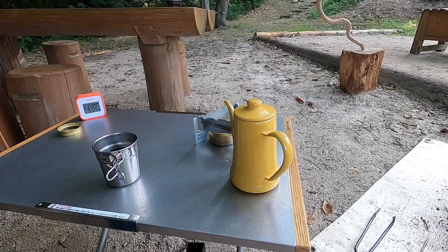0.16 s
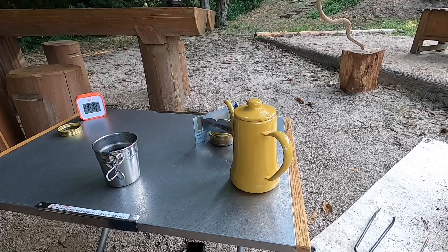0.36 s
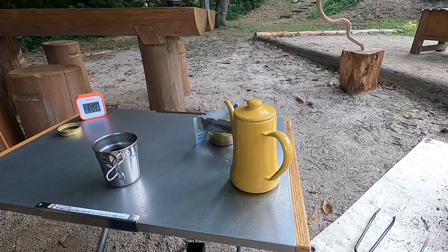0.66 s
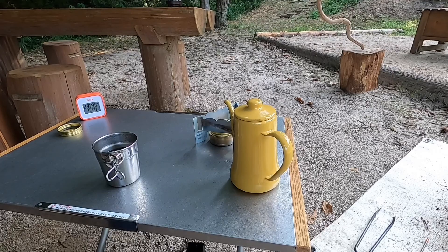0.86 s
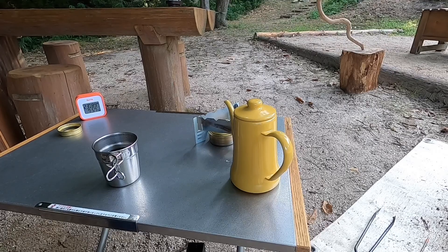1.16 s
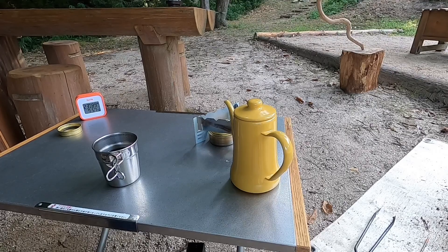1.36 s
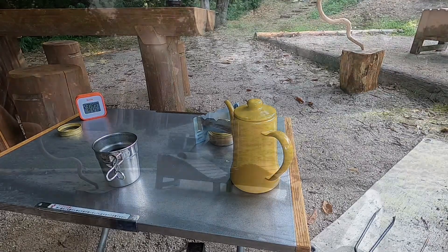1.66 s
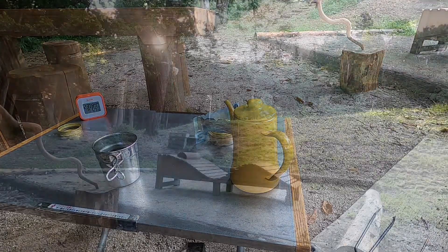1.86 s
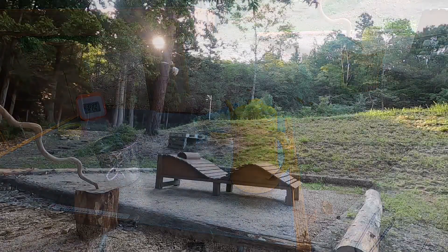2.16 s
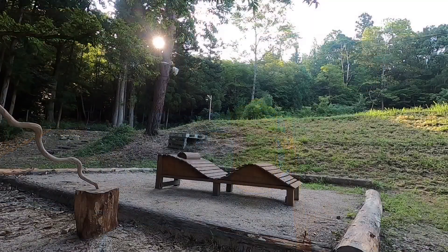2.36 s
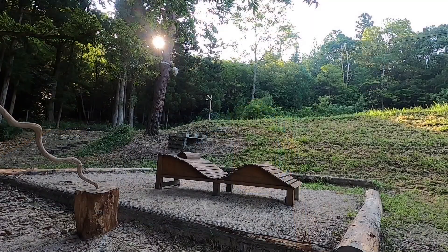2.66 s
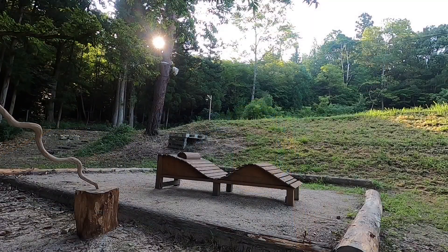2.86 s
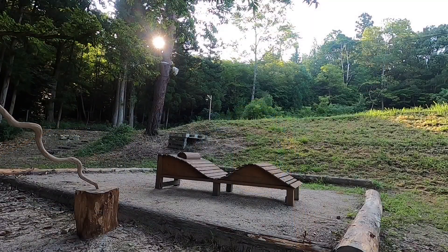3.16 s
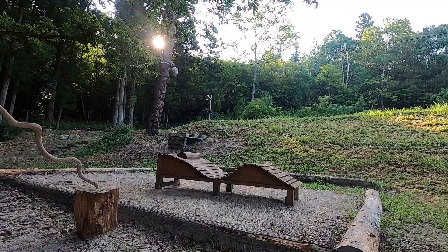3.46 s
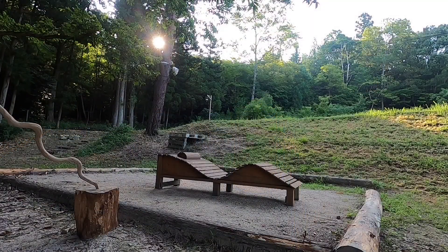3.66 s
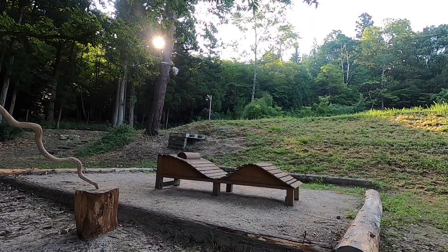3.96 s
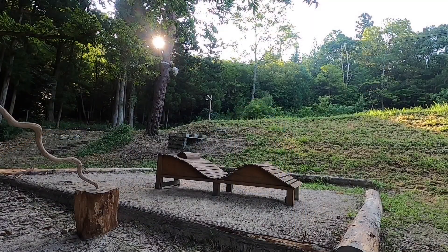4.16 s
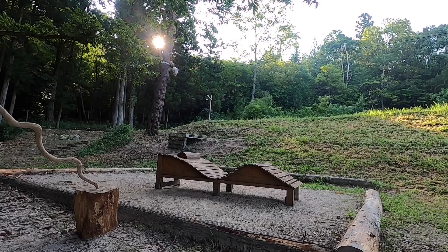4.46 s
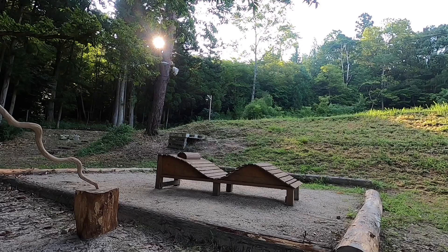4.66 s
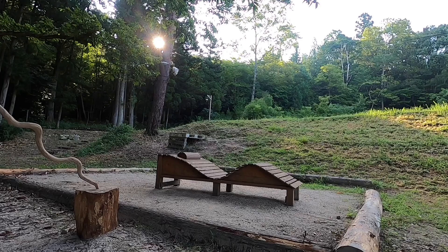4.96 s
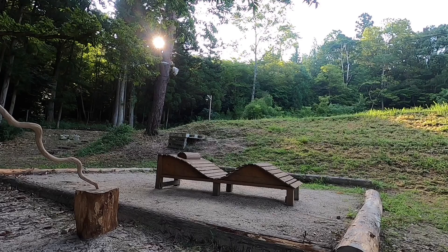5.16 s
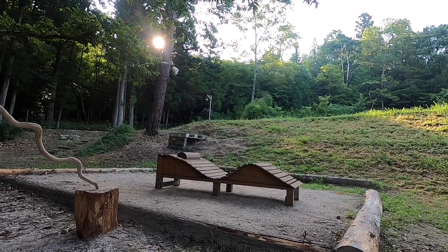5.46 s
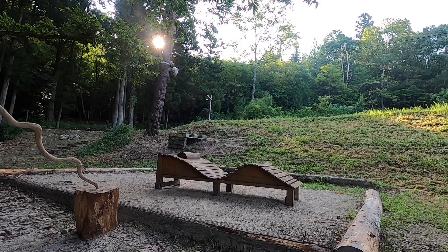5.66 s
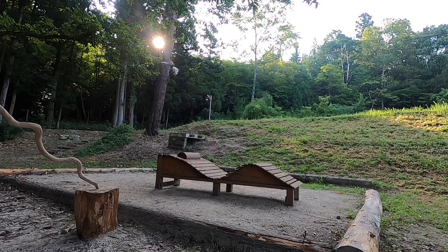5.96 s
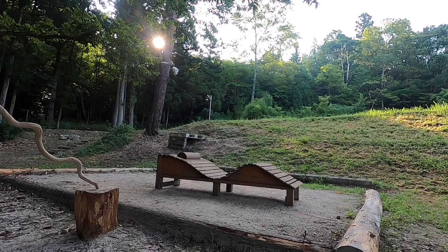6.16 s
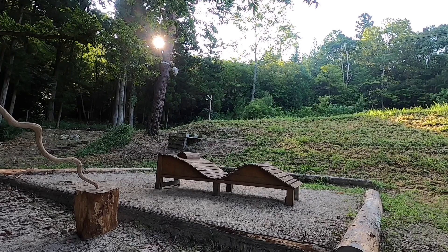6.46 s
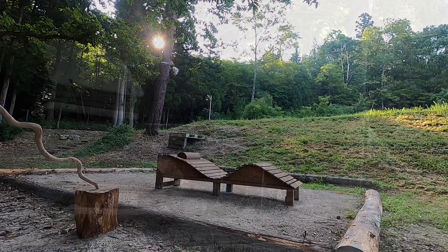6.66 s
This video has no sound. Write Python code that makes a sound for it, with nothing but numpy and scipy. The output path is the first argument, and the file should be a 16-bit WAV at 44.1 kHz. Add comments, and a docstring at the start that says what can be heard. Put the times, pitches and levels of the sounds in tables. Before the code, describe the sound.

Outdoors at a wooded campsite, a dense, shrill cicada chorus runs throughout. At first one close cicada on the left pulses rapidly over it. The sound cross-fades to an open meadow where lower-voiced cicadas swell, gusts shake the microphone into deep rumbling, and small dry ticks, soft bumps and rustles cluster close on the left. A small bird whistles faintly far off.

```python
"""Cicadas drone in the woods, heard first from a camp table, where one near cicada throbs over the chorus.
A cross-fade leads to a meadow: lower voices swell, a breeze shakes the microphone into a low rumble,
something ticks, bumps and rustles close by on the left, and a small bird calls far off.
Cicadas are random clicks sent through resonances, with thin wavering tones on top. Rumble and rustle are
shaped noise, ticks and bumps are short bursts, and the bird is a gliding sine with echoes."""
import sys
import numpy as np
from scipy import signal
from scipy.fft import rfft, irfft
from scipy.io import wavfile

SR = 44100
rng = np.random.default_rng(int(sys.argv[2]) if len(sys.argv) > 2 else 0)


def dump(signal):
    """Clip the signal to [-1, 1] and save it as 16-bit WAV at the path in sys.argv[1]."""
    limited = np.clip(np.atleast_2d(signal).T, -1, 1)
    pcm = np.round(limited * 32767).astype(np.int16)
    wavfile.write(sys.argv[1], SR, pcm)


N = 299880  # length in samples
T = np.arange(N) / SR  # time of every sample [s]
HZ = np.fft.rfftfreq(N, 1 / SR)  # frequencies of the spectrum [Hz]


def amp(db):
    """Turns decibels into a gain."""
    return np.exp(np.log(10) * np.asarray(db) / 20)


def unit(x):
    """Scales a sound to an average strength (rms) of 1."""
    return x / np.sqrt(np.mean(x ** 2) + 1e-20)


def peaked(x, db):
    """Scales a sound to a peak level."""
    return amp(db) * x / np.max(abs(x))


def read(points):
    """Reads a table over frequency, joining its points on a log axis."""
    hz, value = np.transpose(points)
    return np.interp(np.log(HZ + 1), np.log(hz + 1), value)


def level(rows):
    """Turns a table of (time [s], level [dB]) into a gain for every sample."""
    return amp(np.interp(T, *np.transpose(rows)))


def plateau(start, hold, rise_db, fall_db):
    """Gain of a swell that rises, holds at 1 and falls; slopes in dB per second."""
    before = np.maximum(start - T, 0)
    after = np.maximum(T - start - hold, 0)
    return amp(-abs(rise_db) * before - abs(fall_db) * after)


def colour(x, spectrum, lines=()):
    """Filters by a spectrum with narrow resonances on top, to rms 1."""
    peaks = sum(db / (1 + (2 * (HZ - hz) / width) ** 2) for hz, width, db in lines)
    return unit(irfft(rfft(x) * amp(read(spectrum) + peaks), N))


def band(x, hz):
    """Keeps about an octave around hz."""
    octave = signal.butter(3, [hz / 1.5, hz * 1.35], "band", fs=SR, output="sos")
    return signal.sosfilt(octave, x)


def drift(hz):
    """Slow random wandering of rms 1, up to about hz."""
    return unit(irfft(rfft(rng.standard_normal(N)) / (1 + (HZ / hz) ** 4), N))


def pan(db):
    """Left and right gains for a level difference; positive is louder on the left."""
    return amp(np.array([[db], [-db]]) / 2)


def spread(pair, side_db):
    """Two unrelated sounds as the middle and the sides of a stereo pair."""
    return pair[0] + np.array([[1], [-1]]) * amp(side_db) * pair[1]


def add(mix, s, sound):
    """Adds a sound at time s."""
    part = mix[max(round(s * SR), 0):][:len(sound)]
    part += sound[:len(part)]


def scatter(x, t60):
    """Echoes off ground and trunks: sparse dying taps, different for each ear."""
    t = T[:SR // 2]
    is_tap = rng.random((2, len(t))) < .05
    taps = rng.standard_normal((2, len(t))) * is_tap * amp(-60 * t / t60)
    taps /= np.linalg.norm(taps, axis=1, keepdims=True)
    return signal.fftconvolve(x[None], taps, axes=1)[:, :N]


def tymbals(count, rib_hz, stroke_hz, flutter_db):
    """Many insects: each buckles its ribs in quick clicks, grouped by the strokes of its muscle."""
    out = np.zeros(N)
    for _ in range(count):
        # every insect has its own speeds
        ribs, strokes, flutter = rng.uniform(.7, 1.3, 3)
        gaps = 1 + .12 * rng.standard_normal(9000)
        s = np.cumsum(gaps) / (rib_hz * ribs)
        size = 1 + np.cos(2 * np.pi * (stroke_hz * strokes * s + rng.random()))
        size *= amp(flutter_db * np.sin(2 * np.pi * (10 * flutter * s + rng.random())))
        clicks = size * rng.choice([-1, 1], len(s))
        at = (s * SR).astype(int)
        out += np.bincount(at[at < N], clicks[at < N], N)
    return unit(out)


def tone(hz, waver):
    """A thin strand that wavers in pitch and flickers in level."""
    flicker_db = 1.8
    turns = np.cumsum(hz * (1 + waver * drift(50))) / SR
    return np.sin(2 * np.pi * turns) * amp(flicker_db * drift(9.3))


def chorus(table, meadow):
    """The drone of the woods: tymbal clicks through the insects' body resonance, wider by the table."""
    # colour of the chorus at each place: (frequency [Hz], relative level [dB per Hz])
    table_colour = [(2500, -100), (3800, -31), (4500, -16.5), (5250, -13.5), (5600, -10), (6300, -9.5),
                    (6800, -9.5), (7300, -3.5), (7900, -3), (8500, -5.5), (9100, -13.5), (9700, -25.5),
                    (10400, -33), (12300, -28), (15500, -37)]
    meadow_colour = [(2500, -75), (4000, -35.5), (4900, -26.5), (5250, -37.5), (5900, -30), (6350, -16),
                     (6800, -4.5), (7600, 0), (8500, -6.5), (9100, -12.5), (9700, -22), (10300, -29.5),
                     (10900, -70.5), (15000, -37)]
    # shrill lines that stand out of it: (frequency [Hz], width [Hz], boost [dB])
    table_lines = [(7230, 120, 1), (7780, 110, 1.5), (7990, 80, -3), (8570, 100, 2)]
    meadow_lines = [(5540, 67, 5.4), (6500, 56, 1.1), (7900, 35, 2.1), (7140, 41, 0.86), (7930, 47, 3.1),
                    (8580, 130, 4.7)]
    table_db, meadow_db = -23.0, -25.5  # loudness at each place before panning and fading
    near = np.array([tymbals(count=14, rib_hz=685.0, stroke_hz=167.2, flutter_db=-3.5) for _ in range(2)])
    far = np.array([tymbals(count=30, rib_hz=697.2, stroke_hz=110.1, flutter_db=0.5) for _ in range(2)])
    near = colour(spread(near, side_db=-10.5), table_colour, table_lines)
    near = near * amp(table_db + .5 * drift(37)) * pan(db=1.0)
    far = colour(spread(far, side_db=-20.5), meadow_colour, meadow_lines)
    far = far * amp(meadow_db + 0.35 * drift(36)) * pan(db=1.5)
    return table * near + meadow * far


def throbber(table):
    """One near cicada pumps its abdomen about thirteen times a second, never quite silent in between."""
    # throbs of the near cicada: (time [s], level [dB])
    throb_times = [(.01, -31), (.08, -30), (.14, -29), (.228, -28.5), (.307, -35), (.38, -30), (.445, -33),
                   (.535, -31), (.605, -28), (.677, -32), (.765, -30), (.82, -34), (.9, -33), (.968, -28),
                   (1.048, -33), (1.115, -29.5), (1.201, -27.5), (1.264, -28.5), (1.345, -31),
                   (1.412, -28.5), (1.489, -31.5), (1.57, -32), (1.629, -28.5), (1.715, -33), (1.789, -32),
                   (1.859, -35), (1.935, -33)]
    # colour of its voice: (frequency [Hz], relative level [dB per Hz])
    throb_colour = [(3000, -42), (3900, -18), (4500, -6), (5200, -5), (5600, -2), (6300, -1), (7000, -7),
                    (8300, -9), (9300, -20), (10500, -37)]
    # shrill lines in that voice: (frequency [Hz], width [Hz], boost [dB])
    throb_lines = [(4494, 35, 8), (4591, 40, 8), (4685, 40, 8), (4832, 60, 6), (4956, 40, 8), (5131, 35, 6),
                   (5490, 110, 10), (5690, 80, 4), (5950, 70, 4)]
    # clear strands in its buzz: (frequency [Hz], level against one another [dB])
    strand_table = [(4320, -22), (4494, -16), (4591, -15), (4685, -16), (4832, -16), (4956, -13),
                    (5131, -14), (5336, -17), (5462, -11)]
    width_s, between_db = 0.0145, -38  # spread of a throb to each side, and the level between throbs
    throbs = sum(amp(db) * np.exp(-.5 * ((T - s) / width_s) ** 2) for s, db in throb_times)
    swell = np.hypot(throbs, amp(between_db))
    clicks = np.array([tymbals(count=14, rib_hz=702.0, stroke_hz=161.7, flutter_db=0.0) for _ in range(2)])
    voice = colour(spread(clicks, side_db=-8), throb_colour, throb_lines)
    strands = sum(amp(db) * tone(hz, waver=.0025) for hz, db in strand_table)
    return table * (voice + amp(-1.0) * strands) * swell * pan(db=5.5)


def low_group():
    """Lower-voiced cicadas join in slowly from all around: the same clicks, coloured lower."""
    # swell of the group: (time [s], level [dB])
    swell = [(0, -56), (2.2, -35), (3.5, -33), (4.6, -31.5), (5.3, -32.5), (5.8, -29), (6.4, -28.5),
             (6.8, -32.5)]
    # colour of its voice: (frequency [Hz], relative level [dB per Hz])
    low_colour = [(3000, -86), (4400, -28), (4950, -4), (5250, 0.5), (5500, 4), (5900, 6.5), (6350, 13.5),
                  (6900, -2.5), (8000, -65.5)]
    # shrill lines in that voice: (frequency [Hz], width [Hz], boost [dB])
    low_lines = [(5270, 160, 2.3), (5640, 60, 2.7), (6110, 90, 3), (6640, 160, 11)]
    clicks = np.array([tymbals(count=14, rib_hz=595.2, stroke_hz=98.66, flutter_db=2.5) for _ in range(2)])
    return colour(spread(clicks, side_db=-1.5), low_colour, low_lines) * level(swell) * pan(db=1.5)


def whines():
    """Now and then one cicada holds a wavering, slowly gliding pitch that stands out of the drone."""
    # single whines: (time [s], hold [s], start pitch [Hz], end pitch [Hz], level [dB],
    # pitch waver [share])
    whine_table = [(0, 1.3, 7230, 7220, -38, .002), (0, 1.3, 7770, 7790, -37, .002),
                   (2.3, 1.9, 6150, 6195, -45, .003), (3.05, .45, 6135, 6135, -43, .001),
                   (2.8, 1.3, 5510, 5570, -47, .006), (4.3, 1, 5085, 5135, -51.5, .0015),
                   (4.6, 1.7, 5230, 5340, -49.5, .009), (4.5, 1.4, 6235, 6280, -43, .002),
                   (5.5, .7, 5875, 5900, -44, .002), (5.6, .7, 6360, 6400, -42, .002)]
    slope = 50  # rise and fall [dB per s]
    out = np.zeros(N)
    for s, hold, start_hz, end_hz, db, waver in whine_table:
        hz = np.interp(T, [s, s + hold], [start_hz, end_hz])
        out += amp(db) * tone(hz, waver) * plateau(s, hold, slope, slope)
    return out * pan(db=-1.0)


def rumble(shake_hz=34.35, wander=0.057):
    """Gusts buffet the microphone; the stronger they are, the more they shake it at a wandering low pitch."""
    # gusts: (time at full strength [s], hold [s], level before the lulls [dB], rise [dB per s])
    gust_table = [(.35, .02, -51, 200), (1.393, .02, -48.5, 250), (1.93, 0.036, -43.5, 120),
                  (2.174, .57, -33, 130), (2.92, 0.26, -38, 120), (3.22, .05, -33.5, 92),
                  (3.397, 0.45, -29, 52), (3.95, 0.31, -37.5, 60), (4.293, 0.12, -35, 112),
                  (4.517, 0.027, -37, 88), (4.72, .02, -46, 150), (4.995, 0.45, -43, 150),
                  (5.84, 0.14, -38.5, 66), (6.07, 0.097, -32.5, 150), (6.32, .03, -34.5, 220),
                  (6.464, 0.025, -40.5, 100), (6.64, 0.055, -35.5, 90)]
    # colour of the buffeting: (frequency [Hz], relative level [dB per Hz])
    buffet_colour = [(5, -13), (20, 6), (35, 11), (55, -1.5), (90, -13.5), (135, -11.5), (250, -22.5),
                     (450, -47), (700, -32), (3000, -79)]
    fall, calm_db = 127, -62  # fall of a gust [dB per s], and the level of the calm before the lulls
    lull_db, lulls_hz = 1.5, 7.8  # depth and top speed of the brief dips in the wind
    turn = 2 * np.pi * np.cumsum(shake_hz * (1 + wander * drift(10.1))) / SR
    shake = unit(np.sin(turn) + amp(-17.5) * np.sin(2 * turn))
    swells = [amp(db) * plateau(s, hold, rise, fall) for s, hold, db, rise in gust_table]
    wind = np.max(swells, axis=0)
    lulls = amp(lull_db * (1 - drift(lulls_hz) ** 2))
    force = np.hypot(wind, amp(calm_db)) * lulls
    # share of the power that goes into the shaking
    share = force ** 2 / (force ** 2 + amp(-41) ** 2) * .93
    buffets = colour(spread(rng.standard_normal((2, N)), side_db=-15.0), buffet_colour)
    return force * (np.sqrt(share) * shake + np.sqrt(1 - share) * buffets) * pan(db=0.5)


def body(pitch):
    """The short ring of the small light thing that ticks: a sum of dying tones."""
    # what it rings with: (frequency at pitch 1 [Hz], relative level [dB], time to fall 60 dB [s])
    modes = [(1330, -4, .02), (1620, 0, .028), (1850, 0, .019), (2240, -1, .024), (2620, -10, .018),
             (2980, -7, .02), (3720, -1.5, .016), (4060, -1.5, .015), (4700, -8, .016)]
    t = T[:2048]
    onset = 1 - np.exp(-t / .0002)
    return onset * sum(amp(db - 60 * t / t60) * np.cos(2 * np.pi * hz * pitch * t) for hz, db, t60 in modes)


def clatter(decay_s):
    """The force of one touch: a quick rise, then rough contact that dies away."""
    t = T[:4096]
    return rng.standard_normal(len(t)) * np.exp(-t / decay_s) * (1 - np.exp(-t / .001))


def snap():
    """The force of one hard touch: a sudden snap, then a brief clatter."""
    return np.append(3.2, clatter(decay_s=0.0027))


def ticks():
    """Each tick is a brief clatter: the ring of the body and a dry clack whose pitch depends on the touch."""
    # ticks close on the left: (time [s], peak of the ring before tick_db [dB],
    # peak of the clack before tick_db [dB], pitch of the clack [Hz])
    tick_table = [(2.043, -36, -36, 3820), (2.085, -30, -39, 1700), (2.139, -30, -30, 4030),
                  (2.2384, -27.5, -28, 4040), (2.3023, -27, -33, 4000), (2.346, -27, -30, 3900),
                  (2.381, -25.5, -30, 3600), (2.3962, -32, -28.5, 1440), (2.407, -25.5, -35, 1320),
                  (2.4416, -28.5, -36, 3600), (2.4837, -25, -37, 3900), (2.509, -39, -26, 3580),
                  (2.5172, -35, -26, 3550), (2.526, -33, -22.5, 3760), (2.573, -31, -43, 4000),
                  (2.6715, -41, -33, 3600), (2.842, -27.5, -30, 1250), (3.008, -38, -46, 3300),
                  (3.0423, -34, -42, 1700), (3.063, -41, -27, 2480), (3.0873, -31, -37, 3000),
                  (3.128, -46, -33, 2500), (3.168, -31, -34, 3020), (3.174, -43, -33, 3300),
                  (3.243, -30.5, -40, 2940), (3.288, -33.5, -31, 3100), (3.325, -30.5, -38, 2800),
                  (3.3877, -40, -45, 3000), (3.4312, -31.5, -40, 2400), (3.476, -33, -32, 2640),
                  (3.516, -37, -42, 1790), (3.5568, -37, -39, 2900), (4.0023, -34.5, -43, 2400),
                  (4.032, -33.5, -37, 3700), (4.0438, -31.5, -27, 3000), (4.068, -30.5, -34, 3200),
                  (4.1117, -42, -34, 2500), (4.223, -29.5, -22.5, 4100), (4.81, -52, -39.5, 3400),
                  (6.05, -53, -38.5, 3700)]
    tick_db = 2  # added to every tick
    out = np.zeros(N)
    for s, ring_db, clack_db, hz in tick_table:
        pitch = 1.0 + 0.02 * rng.standard_normal()
        ring = signal.fftconvolve(snap(), body(pitch))
        add(out, s, peaked(ring, tick_db + ring_db))
        add(out, s, peaked(band(snap(), hz), tick_db + clack_db))
    echoes = amp(-9.5) * scatter(out, t60=.06)
    return out * pan(db=9.0) + echoes


def bumps():
    """Soft, quickly damped knocks of something being handled near the microphone."""
    # dull bumps among the ticks: (time [s], peak before bump_db [dB], pitch [Hz])
    bump_table = [(2.4, -39, 480), (2.427, -36, 169), (2.479, -36, 185), (3.086, -35.5, 278),
                  (3.354, -34, 330), (3.387, -38, 400), (3.431, -37, 520), (3.473, -34, 503),
                  (3.52, -34, 130), (3.55, -34.5, 330), (3.593, -37, 278), (3.962, -36, 257),
                  (4.041, -31, 487), (4.068, -37, 520), (4.225, -35, 440), (4.268, -38, 400)]
    bump_db = -3  # added to every bump
    out = np.zeros(N)
    for s, db, hz in bump_table:
        add(out, s, peaked(band(clatter(decay_s=0.0093), hz), bump_db + db))
    return out * pan(db=3.0)


def rustle(grain_db=3.0, grains_per_s=5000):
    """Soft strokes of tiny slips, close on the left; some of them scrape the ticking body."""
    # strokes: (time [s], hold [s], level [dB], share of the power that rings the ticking body [0-1])
    strokes = [(2.068, 0.016, -41.5, 0.26), (2.234, 0.27, -44, 0.25), (2.37, 0.15, -43.5, 0.1),
               (2.605, 0.061, -46, 0), (2.82, 0.48, -44, 0.03), (3.346, 0.22, -37, 0),
               (3.975, 0.12, -41, 0.01), (4.214, 0.05, -41.5, 0.02), (4.605, 0.22, -51, 0),
               (5.14, 0.12, -52.5, 0)]
    # colour of the slips: (frequency [Hz], relative level [dB per Hz])
    slip_colour = [(60, -2), (140, 7.5), (250, 0), (550, 9.5), (850, 1), (1300, 6.5), (2400, 10),
                   (3000, 11), (3900, 11), (5000, 8.5), (8000, -55.5), (12000, -121)]
    rise, fall = 156, 89  # slopes of a stroke [dB per s]
    size = amp(grain_db * np.minimum(rng.exponential(1, (2, N)), 3)) * rng.standard_normal((2, N))
    slips = size * (rng.random((2, N)) < grains_per_s / SR)
    # the right ear gets a faint copy and some slips of its own
    pair = np.array([slips[0], amp(-23.0) * slips[0] + amp(-10.5) * slips[1]])
    scrape = unit(signal.oaconvolve(pair, body(0.92)[None])[:, :N])
    power = np.array([amp(db) * plateau(s, hold, rise, fall) for s, hold, db, _ in strokes]) ** 2
    share = np.clip([ringing for *_, ringing in strokes], 0, 1)
    return np.sqrt(share @ power) * scrape + np.sqrt((1 - share) @ power) * colour(pair, slip_colour)


def bird():
    """Thin slurred whistles from the trees, some pure and some hoarse, blurred by echoes."""
    # calls: (time [s], length [s], start pitch [Hz], middle pitch [Hz], end pitch [Hz],
    # level before the arch of 0 to 1 [dB], pitch wobble [share])
    calls = [(2.465, .06, 3700, 3750, 3830, -46, .004), (2.52, .075, 3800, 3950, 3700, -45, .01),
             (2.84, .07, 4550, 4740, 4800, -53, .01), (3.1, .11, 4220, 4430, 4450, -51.5, .012),
             (3.825, .125, 3690, 3830, 3800, -50, .006), (4.15, .12, 4450, 4830, 5050, -51, .008),
             (4.315, .1, 3930, 4230, 4330, -53.5, .014), (4.607, .08, 3800, 4350, 4200, -47.5, .005),
             (5.08, .1, 3680, 3640, 3580, -53.5, .024)]
    out, waver = np.zeros(N), drift(200)
    for s, length, start, middle, end, db, wobble in calls:
        u = np.linspace(0, 1, round(length * SR))  # progress through the call
        glide = np.polyval(np.polyfit([0, .5, 1], [start, middle, end], 2), u)
        hz = glide * (1 + wobble * waver[round(s * SR):][:len(u)])
        arch = 2 * np.sqrt(u * (1 - u))
        add(out, s, amp(db) * arch * np.sin(2 * np.pi * np.cumsum(hz) / SR))
    return (out + amp(-3) * scatter(out, t60=.55)) * pan(db=8)


def air(spectrum, patchy_db, lines=()):
    """The soft wash of distant woods: coloured noise, diffuse between the ears."""
    # likeness of the two ears: (frequency [Hz], likeness [0-1])
    likeness = [(60, 0.51), (150, 0.64), (400, 0.33), (1400, 0.38), (3100, 0.055)]
    # balance of the two ears: (frequency [Hz], left minus right [dB])
    balance = [(60, -1.5), (300, -1), (700, -0.5), (1300, 2.5), (2400, 5), (4500, 7)]
    a, b = rfft(rng.standard_normal((2, N)))
    same = np.clip(read(likeness), 0, 1)
    pair = np.array([a, same * a + np.sqrt(1 - same ** 2) * b])
    pair = pair * amp(np.outer([.5, -.5], read(balance)))
    return colour(irfft(pair, N), spectrum, lines) * amp(patchy_db * drift(9.0))


def scene():
    """The table fades into the meadow, and all the sources are added up."""
    # cross-fade: start [s], end [s]
    fade = [1.4, 2.4]
    # colour of far woods and air at each place: (frequency [Hz], relative level [dB per Hz])
    table_air = [(10, -34), (25, -7), (55, -6), (115, -14), (170, -7.5), (270, -9.5), (400, -14.5),
                 (850, -18.5), (1200, -13.5), (1750, -20), (2350, -14.5), (2900, -17), (4000, -9.5),
                 (9000, -61)]
    meadow_air = [(10, -4), (40, 6.5), (100, -9), (160, -1), (270, 0), (380, -7), (750, -12), (1010, -8.5),
                  (1450, -9.5), (2000, -13.5), (2500, -17.5), (3400, -22.5), (4500, -11), (9000, -72)]
    # thin tones in the wash by the table: (frequency [Hz], width [Hz], boost [dB])
    air_lines = [(2203, 24, 12), (2385, 43, 12.5), (2570, 45, 7), (2830, 38, 10)]
    meadow = np.interp(T, fade, [0, 1])
    table = 1 - meadow
    cicadas = chorus(table, meadow) + throbber(table) + low_group() + whines()
    close_by = rumble() + ticks() + bumps() + rustle()
    by_table = amp(-45.5) * air(table_air, patchy_db=1.0, lines=air_lines)
    in_meadow = amp(-48.0) * air(meadow_air, patchy_db=2.0)
    return cicadas + close_by + bird() + table * by_table + meadow * in_meadow


def record(dry):
    """The recorder's band limit: a steep filter that takes away what lies above 15600 Hz."""
    low_pass = signal.firwin(511, 15600, window=("kaiser", 9), fs=SR)
    return signal.oaconvolve(dry, low_pass[None], "same")


dry = scene()
out = record(dry)
dump(out)
```